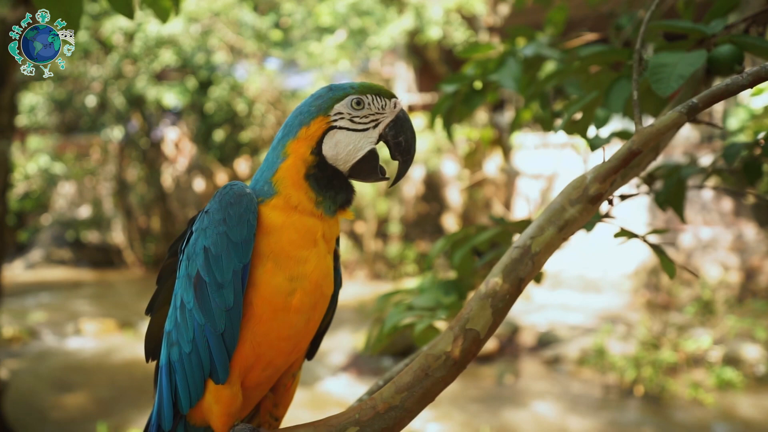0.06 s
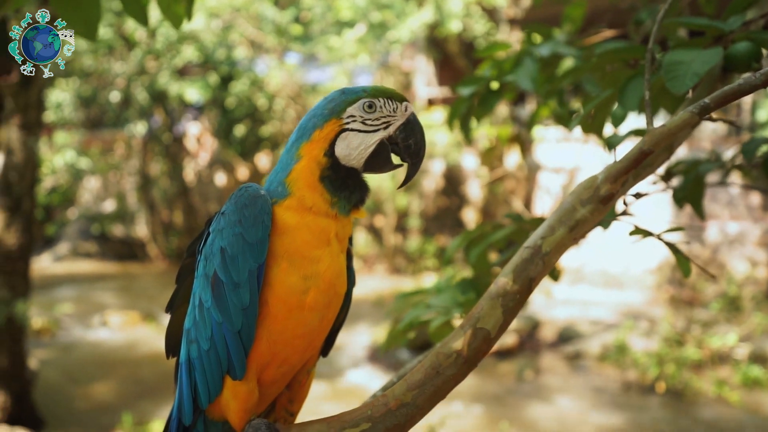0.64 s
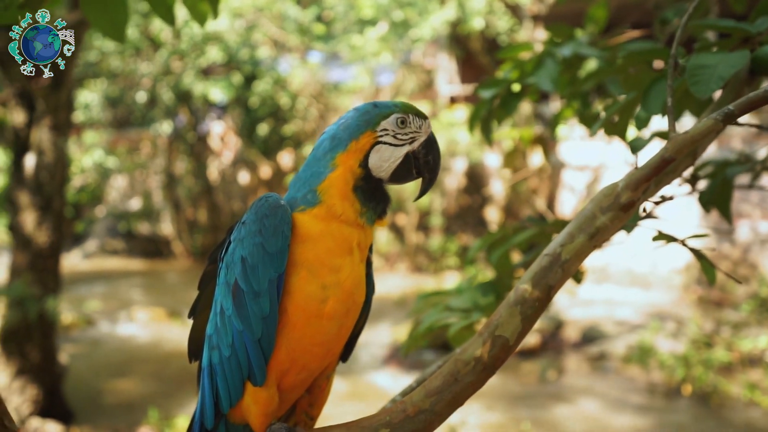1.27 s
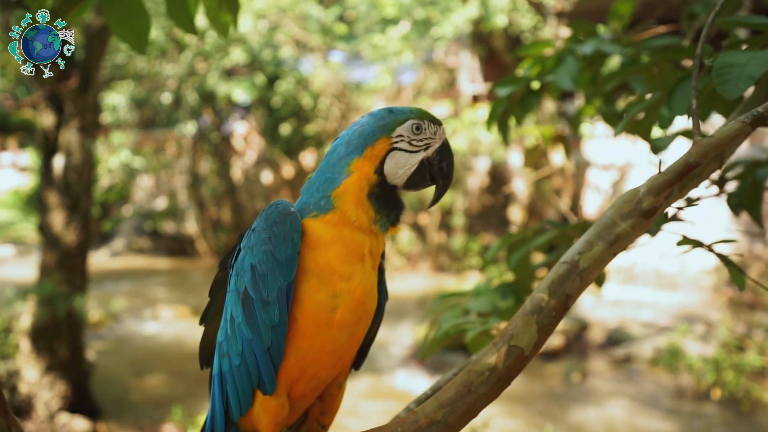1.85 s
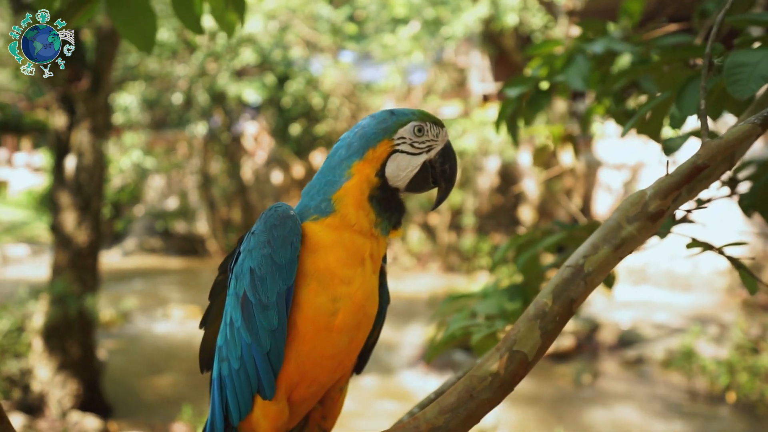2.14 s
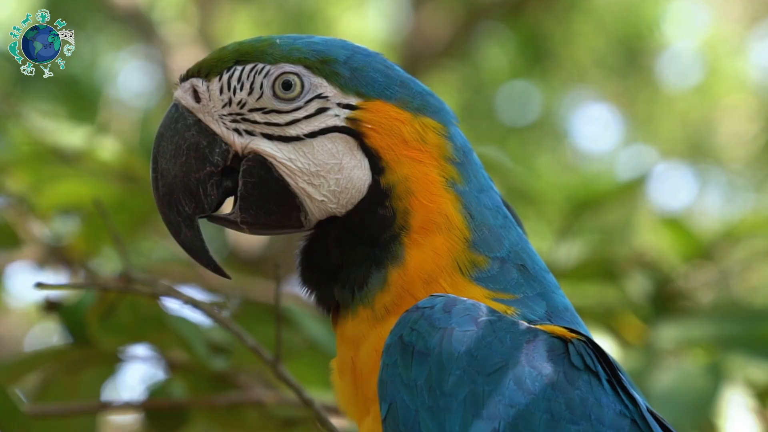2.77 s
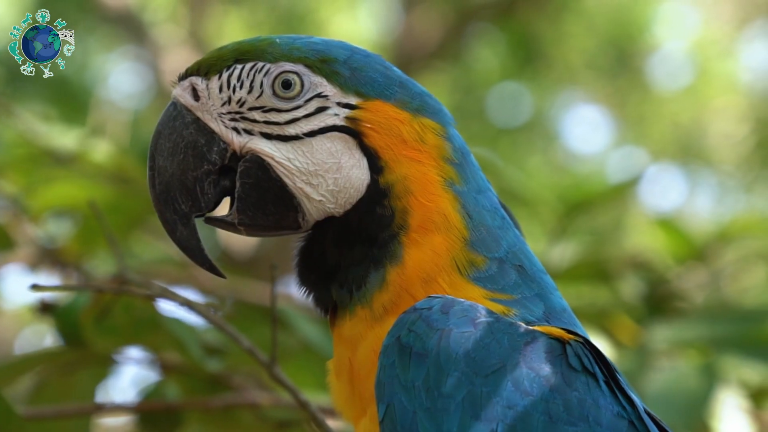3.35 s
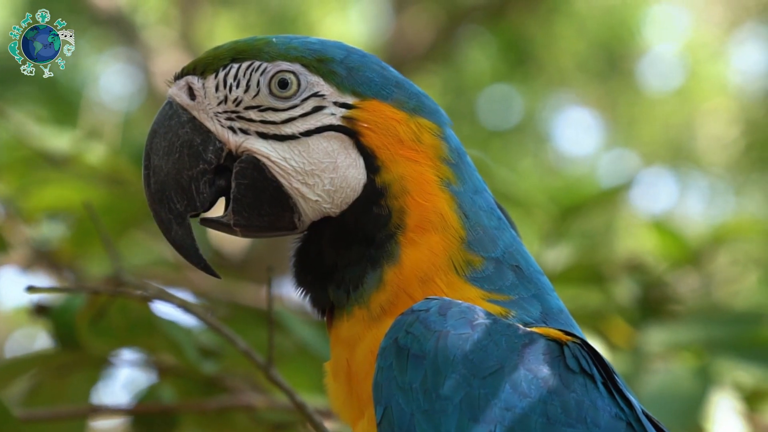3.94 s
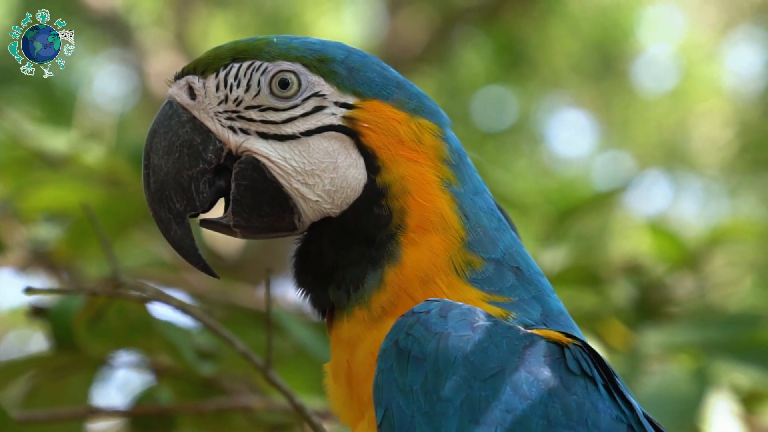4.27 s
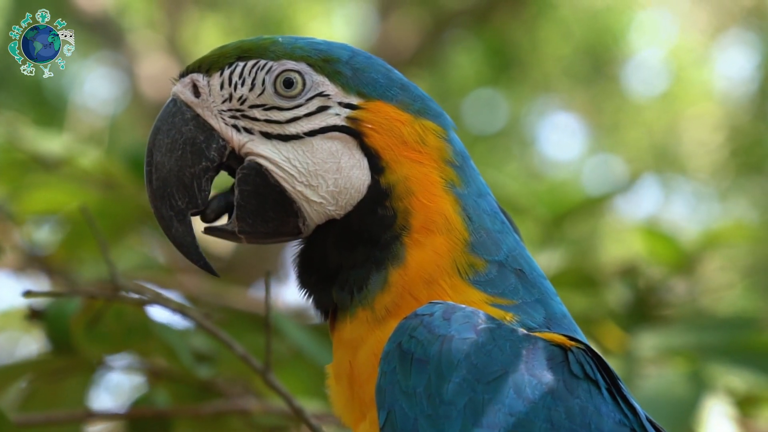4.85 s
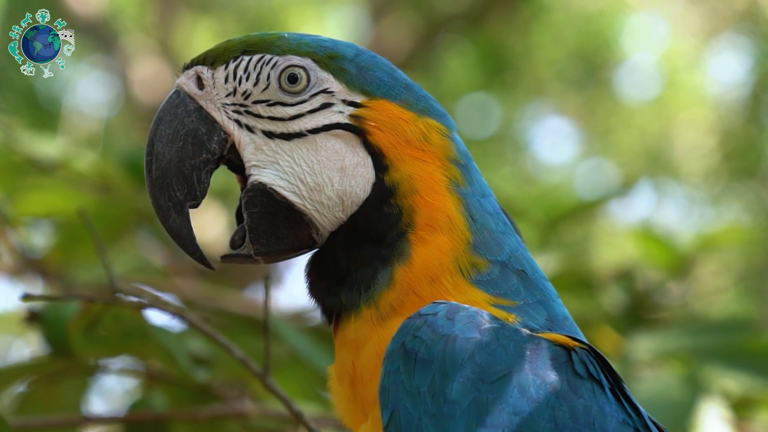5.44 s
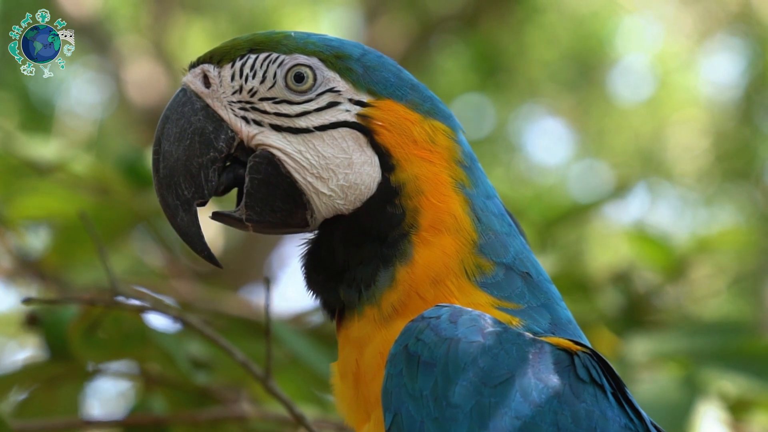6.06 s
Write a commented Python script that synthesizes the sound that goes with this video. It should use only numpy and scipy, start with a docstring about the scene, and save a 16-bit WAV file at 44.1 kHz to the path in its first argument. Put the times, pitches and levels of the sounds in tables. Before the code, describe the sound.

In a quiet forest with a soft rush of leaves and water, the tail of a nearby macaw's scream rings out. Faint insects, small bird chips and a distant macaw fill the pause. Then the close bird creaks briefly, lets out a loud rasping squawk and follows it with a hoarse, octave-flipping yodel. The trees return a long echo, leaving only the faint background.

```python
"""A macaw close to the microphone in a forest: the end of a scream, a short creak, a long harsh squawk
and a yodelling call that flips octaves. Its syrinx pulses ring the throat and open beak, and the
trees return a long echo. Farther back small birds chip and insects whine and chirp with their wings;
another macaw answers from far off, over a soft rush of leaves and water."""
import sys
import numpy as np
from scipy import signal
from scipy.fft import rfft, irfft, next_fast_len
from scipy.io import wavfile
from scipy.ndimage import uniform_filter1d

SR = 44100
rng = np.random.default_rng(int(sys.argv[2]) if len(sys.argv) > 2 else 0)


def generate_wav(signal):
    """Clip the signal to [-1, 1] and save it as 16-bit WAV at the path in sys.argv[1]."""
    frames = np.transpose(np.atleast_2d(signal))
    scaled = np.clip(frames, -1, 1) * 32767
    pcm = np.round(scaled).astype(np.int16)
    wavfile.write(sys.argv[1], SR, pcm)


N = 273420
LEAD = int(.6 * SR)  # the scream is already under way at 0 s
TIME = np.arange(-LEAD, N) / SR
TOP_HZ = 9950  # upper limit of the overtones and of the whole sound


def undb(db):
    """Decibels to gain."""
    return 10 ** (np.asarray(db) / 20)


def unit(x):
    """Scale to rms 1."""
    return x / np.sqrt(np.mean(x ** 2) + 1e-20)


def band(size, hz, width_hz):
    """Noise of rms 1 in a bell-shaped band; around 0 Hz it is a random wander."""
    padded = next_fast_len(size + SR // 10, real=True)
    f = np.arange(padded // 2 + 1) * SR / padded
    spectrum = rfft(rng.standard_normal(padded)) / (1 + (2 * (f - hz) / width_hz) ** 4)
    return unit(irfft(spectrum, padded)[:size])


def colour(x, points, size=4096):
    """Causal filter through (f/Hz, gain/dB) points, so that each pulse rings after it strikes."""
    hz, db = np.transpose(points)
    f = np.maximum(np.arange(size // 2 + 1) * SR / size, 1)
    cepstrum = irfft(np.log(undb(np.interp(np.log(f), np.log(hz), db))))
    cepstrum[1:size // 2] *= 2
    cepstrum[size // 2 + 1:] = 0
    return signal.fftconvolve(x, irfft(np.exp(rfft(cepstrum))))[:len(x)]


def add(out, start, x):
    """Mix a sound in at its start time."""
    i = max(int(start * SR) + LEAD, 0)
    out[i:i + len(x)] += x[:len(out) - i]


def fade(t, attack_s, release_s):
    """Attack, hold and release."""
    return np.clip((t - t[0]) / attack_s, 0, 1) * np.clip((t[-1] - t) / release_s, 0, 1)


def forest_air(level_db=-66.5):
    """A soft, even rush of distant leaves and water."""
    # spectrum of the rush: f/Hz, relative level/dB
    rush = [(15, -29.5), (25, -5), (130, -3), (430, -0.5), (600, -3), (1400, -4), (2200, -7.5), (3450, -13),
            (4800, -13), (6500, -11.5), (9850, -17.5)]
    return unit(colour(rng.standard_normal(len(TIME)), rush)) * undb(level_db)


def forest_echo(x, wet_db, far_db, far_t60_s, leaves_db, leaves_s):
    """Leaves scatter the sound at once, trunks echo it and the far woods hold a faint tail."""
    # echo bands of the forest: f/Hz, relative level/dB, t60/s
    echo_bands = [(402, -1, 1.2), (700, -3, 1.6), (1000, -3, 1.65), (1850, -3.5, 1.624), (2670, 0.5, 1.18),
                  (4200, 11, 0.9), (8000, 4.5, 0.64)]
    # walls of trees that send the sound back late: delay/s, spread/s, lift/dB
    tree_walls = [(.3, 0.037, 3), (.6, .12, 5.5)]
    size = 2 * SR
    t = np.arange(size) / SR
    f = np.maximum(np.arange(size // 2 + 1) * SR / size, 1)
    hz, dbs, t60s = np.transpose(echo_bands)
    noise = rfft(rng.standard_normal(size)) / np.sqrt(SR)
    walls = sum(undb(db) * np.exp(-.5 * ((t - delay) / spread) ** 2) for delay, spread, db in tree_walls)
    leaves = undb(leaves_db) * np.exp(-t / leaves_s)
    response = 0
    for share, db, t60 in zip(np.eye(len(hz)), dbs, t60s):
        scatter = irfft(noise * np.interp(np.log(f), np.log(hz), share))
        trunks = (1 + walls) * undb(-60 * t / t60)
        far = undb(far_db - 60 * t / (far_t60_s * t60 / t60s.max()))
        response += scatter * (undb(db + wet_db) * (trunks + far) + leaves)
    return signal.fftconvolve(x, response)[:len(x)]


def far_insects(high_db=-80.5, swell_db=.9):
    """Many far wings blur into three steady bands, each swelling slowly by itself."""
    # course of the chorus: t/s, low band level/dB, thin whine level/dB
    chorus = [(0, -70, -70), (1.0, -77, -80), (1.2, -70.5, -76), (1.7, -72, -83), (2.1, -73, -75),
              (2.7, -75, -80), (3.7, -73, -73), (4.7, -69.5, -78), (5.5, -76.5, -81), (6.2, -75.5, -82)]
    times, *levels = np.transpose(chorus)
    low_db, whine_db = (np.interp(TIME, times, db) for db in levels)
    size = next_fast_len(len(TIME))
    out = 0
    for db, hz, width_hz in ((low_db, 5380, 420), (whine_db, 6880, 70), (high_db, 7250, 750)):
        swell = undb(swell_db * band(size, 0, 5))
        out += undb(db) * (swell * band(size, hz, width_hz))[:len(TIME)]
    return out


def near_insects(stroke_hz=107, uneven=.05, sweep=.044, waver=.012, throb_db=2, period_s=.247):
    """Each chirp is a run of wing strokes, and each stroke a shrill tone that slides down."""
    # lone chirps and buzzes: t/s, length/s, f/Hz, level/dB
    lone_chirps = [(.16, .11, 7370, -67), (2.155, .048, 5100, -67.5), (2.615, .075, 6780, -71),
                   (2.89, 0.28, 6870, -69.5), (4.976, 0.042, 5250, -57), (5.033, .02, 5200, -58.5),
                   (5.061, 0.2, 5230, -55), (5.275, .048, 5220, -55.5), (5.28, .064, 5790, -70.5),
                   (5.91, .099, 7360, -72)]
    # one insect chirps at an even pace, a little louder each time
    paced_chirps = [(.298 + k * period_s, .08, 6890, -68 + k * .54) for k in range(6)]
    out = np.zeros(len(TIME))
    for start, length, hz, db in paced_chirps + lone_chirps:
        size = int(length * SR)
        stroke = np.cumsum(stroke_hz * (1 + uneven * band(size, 0, 60))) / SR % 1
        pitch = hz * (1 + sweep * (.5 - stroke) + waver * band(size, 0, 400))
        tone = np.sin(2 * np.pi * np.cumsum(pitch) / SR) * np.sin(np.pi * stroke)
        throb = undb(throb_db * band(size, 0, 40))
        add(out, start, undb(db) * unit(tone * throb) * signal.windows.tukey(size, .03))
    return out


def small_birds(top_hz=4640, end_hz=3990, full_db=-51.5, hz_per_db=27, sweep_s=.011, gap_s=.0135):
    """Back in the trees, each chip is a quick pair of downward whistles with a weak third."""
    # chips: t/s, level/dB
    chips = [(1.32, -64), (1.389, -64.5), (1.694, -62), (1.77, -67), (1.86, -64), (2.05, -52.5),
             (2.161, -64.5), (2.335, -51.5), (2.46, -62.5), (2.569, -52), (2.83, -51.5), (4.588, -63.5),
             (4.86, -65), (5.144, -63), (5.475, -64), (6.134, -65)]
    out = np.zeros(len(TIME))
    progress = np.linspace(0, 1, int(sweep_s * SR))
    for start, db in chips:
        first_hz = top_hz + hz_per_db * (db - full_db)  # a harder chip is also higher
        slide_hz = first_hz + (end_hz - first_hz) * progress
        for k, strength in enumerate((.75, 1, .3)):
            detune = 1 + .009 * rng.standard_normal()
            whistle = np.sin(2 * np.pi * np.cumsum(slide_hz * detune) / SR)
            add(out, start + k * gap_s, strength * undb(db) * np.sin(np.pi * progress) * whistle)
    return out


def windpipe(x, ring_s):
    """The windpipe holds each frequency back for its own short time, so the pulses run together."""
    size = 2 * next_fast_len(len(x), real=True)
    f = np.arange(size // 2 + 1) * SR / size
    knots = np.linspace(0, SR / 2, 90)
    delay = np.interp(f, knots, ring_s * rng.random(len(knots)))
    lag = 2 * np.pi * np.cumsum(delay) * SR / size
    return irfft(rfft(x, size) * np.exp(-1j * lag))[:len(x)]


def syrinx(t, hz, gain, beak, rasp, odd, tilt_db_oct, jitter, shimmer, hiss, flutter_hz, ring_s, growl=0):
    """Pulses ring throat and beak; rasp shakes their timing and size and lets air hiss once a cycle."""
    rasp, odd, size = np.clip(rasp, 0, 1), np.clip(odd, 0, 1), len(t)
    phase = 2 * np.pi * np.cumsum(hz) / SR + jitter * rasp * band(size, 0, flutter_hz)
    pulses = 0
    for k in range(1, int(TOP_HZ / hz.mean())):
        tilt = undb(tilt_db_oct * np.log2(np.clip(k * hz, 600, 3500) / 1700))
        # the membranes keep changing shape, so each overtone flickers by itself
        flicker = undb(3.7 * rasp * band(size, 0, 50))
        # without its odd harmonics the voice jumps up an octave
        pulses += (odd if k % 2 else 1) * tilt * flicker * np.cos(k * phase)
    pulses /= np.sqrt(uniform_filter1d(pulses ** 2, size=900) + 1e-12)
    air = unit(rng.standard_normal(size) * (1 + np.cos(phase)))
    # a second, slower vibration puts ragged sidebands between the harmonics
    shake = shimmer * band(size, 0, flutter_hz) + growl * band(size, 190, 149)
    source = (pulses + hiss * rasp * air) * np.exp(rasp * shake)
    voice = colour(windpipe(source, ring_s), beak)
    power = uniform_filter1d(voice ** 2, size=700)
    out = np.zeros(len(TIME))
    add(out, t[0], voice / np.sqrt(power + 1e-12) * gain)
    return out


def far_macaw(fall_oct_per_s=6.2):
    """Yelps that climb to a crest and fall away, dulled by distance."""
    # yelps: start t/s, crest t/s, end t/s, first f/Hz, crest f/Hz, level/dB
    yelps = [(1.699, 1.87, 1.92, 490, 660, -69.5), (2.94, 3.009, 3.025, 458, 548, -68),
             (5.744, 5.831, 5.845, 420, 601, -68.5), (5.885, 5.988, 6.065, 518.5, 674, -66.5)]
    # throat and beak heard from far off: f/Hz, gain/dB
    far_beak = [(300, -24), (600, -16), (1000, -1.5), (1300, -4), (2100, 2), (2600, -8.5), (3500, -24),
                (8000, -55.5)]
    out = 0
    for start, crest, end, first_hz, crest_hz, db in yelps:
        t = np.arange(start, end, 1 / SR)
        climb_hz = np.interp(t, [start, crest], [first_hz, crest_hz])
        fall = 2 ** (-fall_oct_per_s * np.maximum(t - crest, 0))
        gain = undb(db) * fade(t, .025, .025)
        out += syrinx(t, climb_hz * fall, gain, far_beak, rasp=.33, odd=.55, tilt_db_oct=-5.5,
                      jitter=.4, shimmer=.5, hiss=.5, flutter_hz=256, ring_s=.0034)
    return out


def note(row, attack_s, release_s, sag=0, sag_s=.052, droop_oct_per_s=0):
    """Time, pitch and gain of a held note; sag is the share of pitch lost as the air runs out."""
    start, end, hz, db = row
    t = np.arange(start, end, 1 / SR)
    pitch = hz * 2 ** (-droop_oct_per_s * (t - start)) * (1 - sag * np.exp((t - end) / sag_s))
    return t, pitch, undb(db) * fade(t, attack_s, release_s)


def phrase(rows, attack_s=.021, release_s=.02):
    """Time, pitch and gain of a call that rises and falls along a curve."""
    times, hz, db = np.transpose(rows)
    t = np.arange(times[0], times[-1], 1 / SR)
    return t, np.interp(t, times, hz), undb(np.interp(t, times, db)) * fade(t, attack_s, release_s)


def slack(hz, full_voice_hz=435):
    """Octaves below the full voice, where the membranes slacken and turn dull or raspy."""
    return np.log2(full_voice_hz / hz)


def scream():
    """A held scream that frays as its pitch drops."""
    # the note: start t/s, end t/s, f/Hz, level/dB
    held_note = (-.55, 0.0708, 478, -17.8)
    # throat and beak in the scream: f/Hz, gain/dB
    beak = [(200, -57.5), (400, -34.5), (650, -22), (860, -15.5), (1050, -16), (1220, -12), (1380, -5),
            (1550, -9), (1800, 0), (2100, -0.5), (2400, -6.5), (2800, -12), (4200, -25), (5200, -32.5),
            (7700, -43), (9500, -54)]
    t, hz, gain = note(held_note, attack_s=.3, release_s=.07, sag=.38)
    return syrinx(t, hz, gain, beak, rasp=.58 + 1.5 * slack(hz), odd=.95, tilt_db_oct=.75,
                  jitter=.29, shimmer=.45, hiss=.35, flutter_hz=374, ring_s=.0035)


def creak():
    """Slowing, separate pulses behind a shut beak, which rings only briefly."""
    # the note: start t/s, end t/s, first f/Hz, level/dB
    low_note = (3.025, 3.09, 156, -39.5)
    # throat and shut beak: f/Hz, gain/dB
    shut_beak = [(150, -39), (300, -20), (850, -19), (1150, -10.5), (1380, 5.5), (1600, -9.5),
                 (1900, -17.5), (2300, -3), (2600, -19), (3400, -24.5), (4500, -40), (9000, -51)]
    t, hz, gain = note(low_note, attack_s=.021, release_s=.024, droop_oct_per_s=5.8)
    return syrinx(t, hz, gain, shut_beak, rasp=.31, odd=.72, tilt_db_oct=.4,
                  jitter=.15, shimmer=.33, hiss=.67, flutter_hz=199.7, ring_s=.0008)


def squawk(slump_hz_per_s=750, opening_s=.04, tremble_db=.74, tremble_pitch=.004):
    """The beak swings wide open; level and pitch tremble together; rasp flares as the pitch slumps."""
    # the squawk surges twice, holds and sinks: t/s, f/Hz, level/dB
    contour = [(3.119, 380, -32.5), (3.15, 426, -25.5), (3.195, 464, -21), (3.245, 428, -24.5),
               (3.29, 439, -22.5), (3.32, 470, -19), (3.35, 438.1, -22), (3.405, 446, -21),
               (3.475, 449, -20.5), (3.56, 432.8, -21.5), (3.605, 420.8, -22), (3.664, 330.2, -28)]
    # throat and wide-open beak: f/Hz, gain/dB
    wide_beak = [(200, -60.5), (340, -39), (470, -27), (660, -20.5), (760, -27.5), (880, -13.5),
                 (1080, -15.5), (1350, -6.5), (1550, -9.5), (1800, -1.5), (2250, -2), (2470, -9.5),
                 (2700, -6), (3100, -17), (3500, -17), (4600, -27), (5700, -35), (6200, -46), (9500, -51)]
    t, hz, gain = phrase(contour)
    slump = np.clip(-np.gradient(hz, t) / slump_hz_per_s, 0, 1)
    rasp = np.linspace(.62, .46, len(t)) + .38 * slump + .14 * band(len(t), 0, 40)
    tremble = band(len(t), 0, 70)
    hz *= 1 + tremble_pitch * tremble
    gain *= undb(tremble_db * tremble)
    shut = np.exp(-((t - t[0]) / opening_s) ** 2)
    tilt = .36 - 18 * slack(hz) - 7 * shut - slump
    return syrinx(t, hz, gain, wide_beak, rasp * (1 - shut / 2), odd=.82, tilt_db_oct=tilt,
                  jitter=.33, shimmer=.38, hiss=.48 * (1 - shut), flutter_hz=260, ring_s=.0048, growl=.36)


def yodel(flip_s=.007, catch_s=.055, fray_s=.027, crack_s=.0055, crack_db=-2.5, waver=.003):
    """A hoarse start clears into a high note that twice cracks down an octave, then frays."""
    # the yodel climbs in three arches: t/s, low register f/Hz, level/dB
    contour = [(3.805, 279, -42), (3.86, 296, -37.5), (3.915, 321.4, -28), (3.935, 382.7, -29.5),
               (3.958, 383, -31.5), (3.966, 486, -27), (3.98, 487, -24.5), (3.997, 526, -27),
               (4.014, 484.2, -27.5), (4.023, 418, -27), (4.047, 402, -32.5), (4.072, 374, -28.5),
               (4.092, 429, -23.8), (4.112, 409.3, -24.5), (4.168, 418.7, -23.5), (4.197, 299.8, -27.5)]
    # spells in the low register, outside which it sings an octave up: start t/s, end t/s
    breaks = [(3.963, 4.017), (4.098, 4.186)]
    # throat and half-open beak: f/Hz, gain/dB
    half_beak = [(200, -66.5), (400, -24.5), (620, -23), (850, -11.5), (1250, 1), (1700, 0), (2080, 0),
                 (2500, -8), (2900, -10.5), (3300, -13.5), (3750, -18.5), (4300, -27), (4700, -23.5),
                 (5300, -37), (7300, -35.5), (8500, -54)]
    t, hz, gain = phrase(contour)
    low = sum(np.clip(np.minimum(t - start, end - t) / flip_s + .5, 0, 1) for start, end in breaks)
    cracks = sum(np.exp(-((t - edge) / crack_s) ** 2) for edge in np.ravel(breaks))
    hoarse_ends = np.exp(-((t - t[0]) / catch_s) ** 2) + np.exp(-((t[-1] - t) / fray_s) ** 2)
    rasp = .12 + .05 * low + .39 * cracks + hoarse_ends + .05 * band(len(t), 0, 50)
    rasp += np.maximum(-slack(hz), 0)  # pushed above its full voice, the note turns harsh
    tilt = 2.5 * (1 - low / 2) - 23 * np.maximum(slack(hz), 0) * (1 - low)
    hz *= 1 + waver * band(len(t), 0, 160)
    gain *= undb(crack_db * cracks)
    return syrinx(t, hz, gain, half_beak, rasp, odd=.035 + low, tilt_db_oct=tilt,
                  jitter=.27, shimmer=.35, hiss=.55, flutter_hz=240, ring_s=.0028, growl=.15)


def scene():
    """One microphone in the woods, with callers at three distances over insects and air."""
    near = scream() + creak() + squawk() + yodel()
    middle = small_birds() + near_insects()
    far = far_macaw()
    # the farther the caller, the more of its sound comes by way of the leaves
    near += forest_echo(near, wet_db=-8.5, far_db=-20.5, far_t60_s=6.45, leaves_db=1, leaves_s=.039)
    middle += forest_echo(middle, wet_db=-10, far_db=-30.5, far_t60_s=4, leaves_db=6, leaves_s=.024)
    far += forest_echo(far, wet_db=-6.5, far_db=-28, far_t60_s=4, leaves_db=14.5, leaves_s=.035)
    return (near + middle + far + far_insects() + forest_air())[None, LEAD:]


def record(dry):
    """The sound starts without a click, and the highest treble is cut."""
    onset = np.minimum(np.arange(N) / 50, 1)
    return signal.sosfilt(signal.ellip(10, .2, 70, TOP_HZ, fs=SR, output="sos"), dry * onset)


dry = scene()
out = record(dry)
generate_wav(out)
```